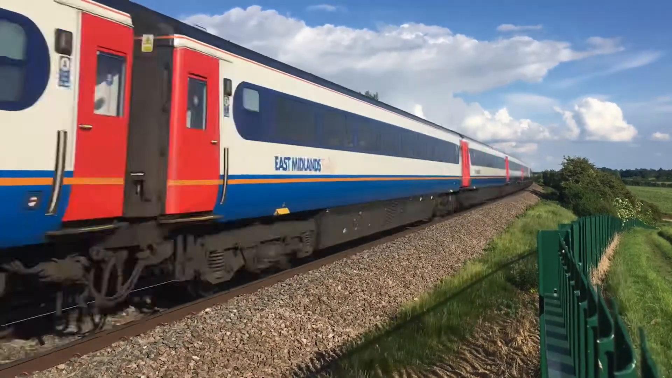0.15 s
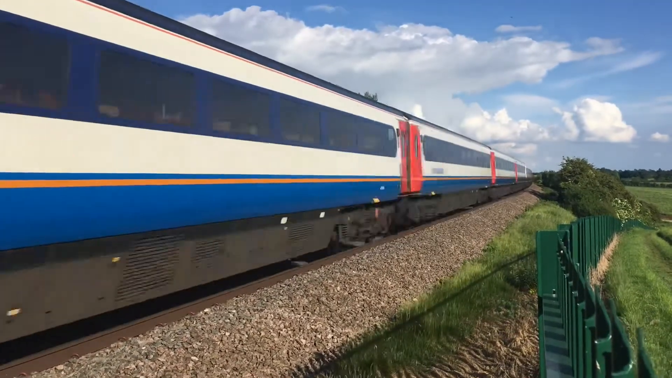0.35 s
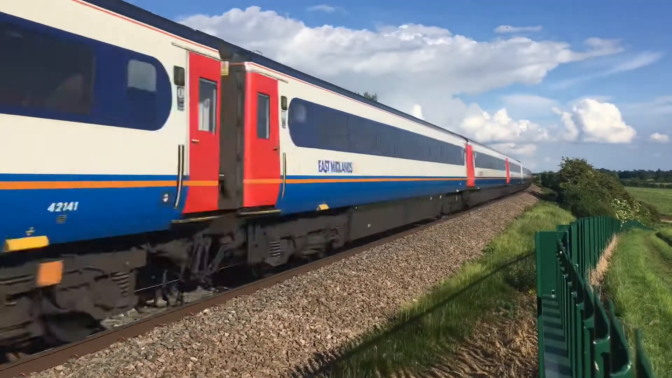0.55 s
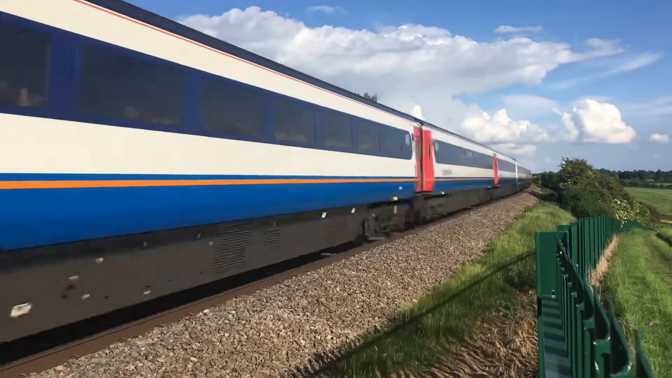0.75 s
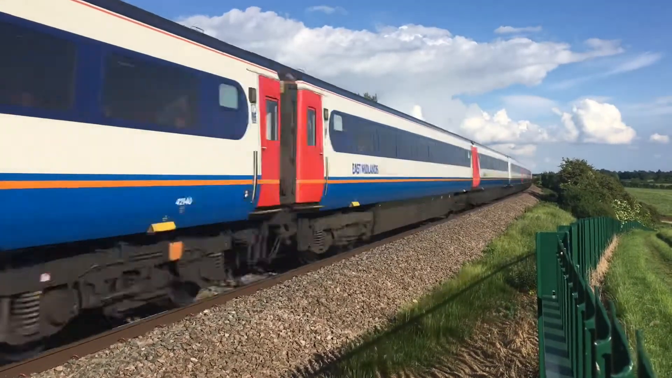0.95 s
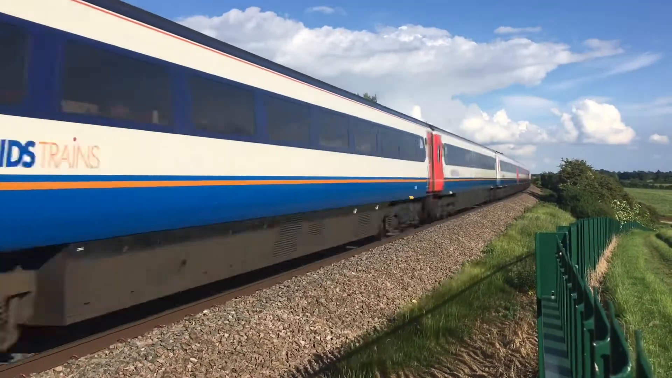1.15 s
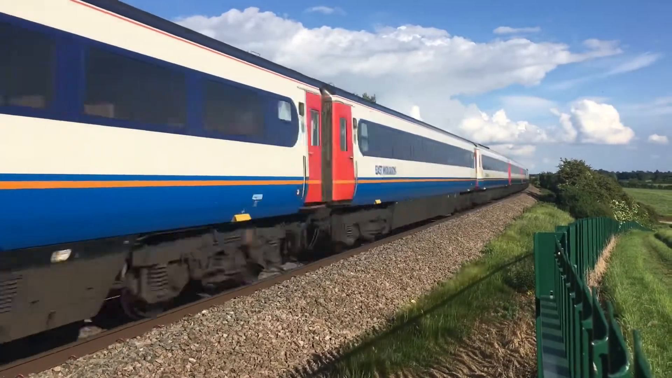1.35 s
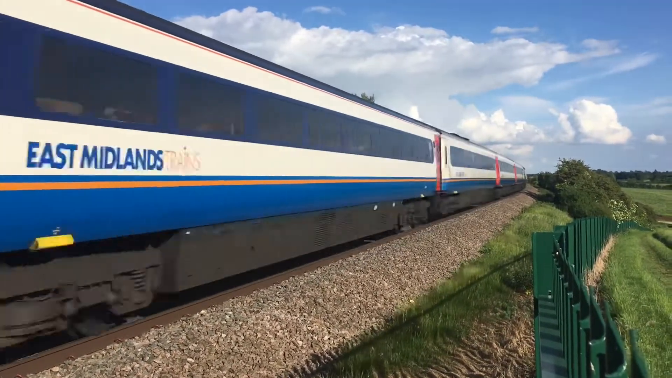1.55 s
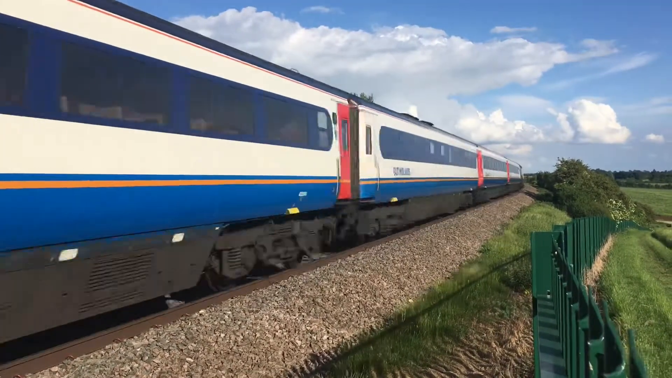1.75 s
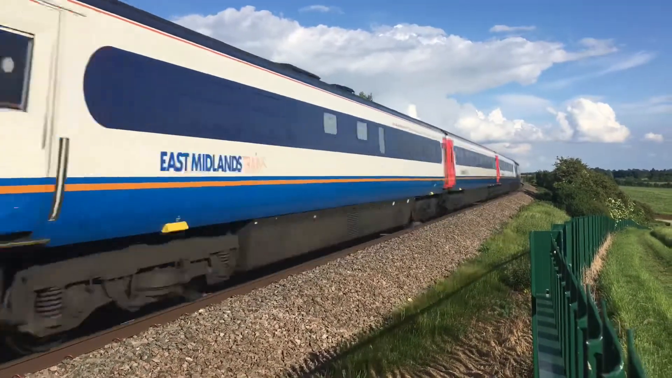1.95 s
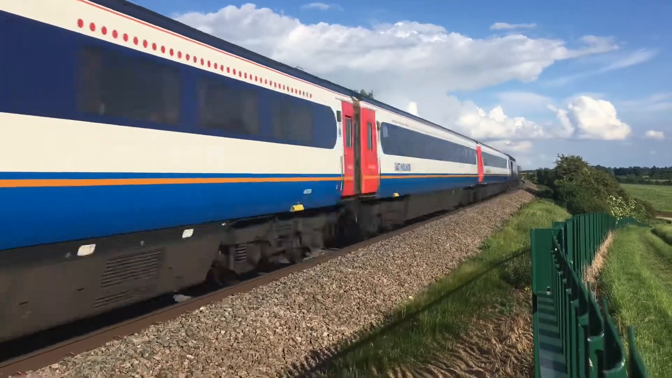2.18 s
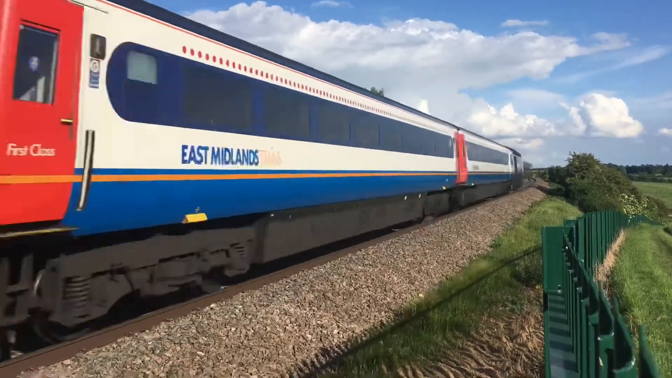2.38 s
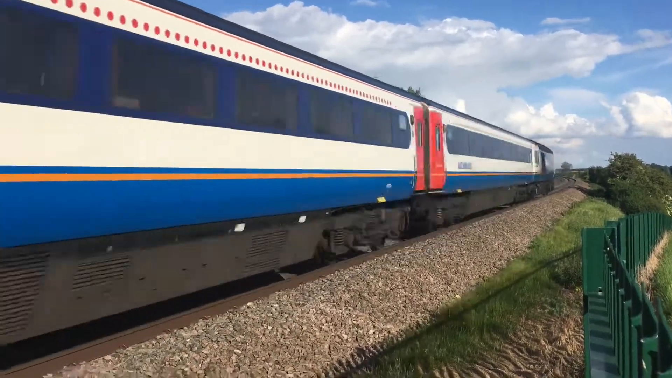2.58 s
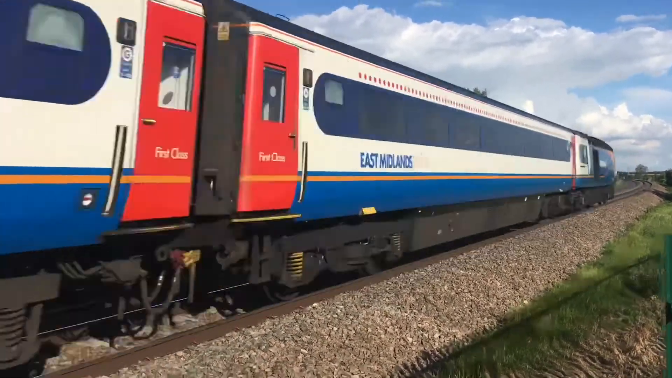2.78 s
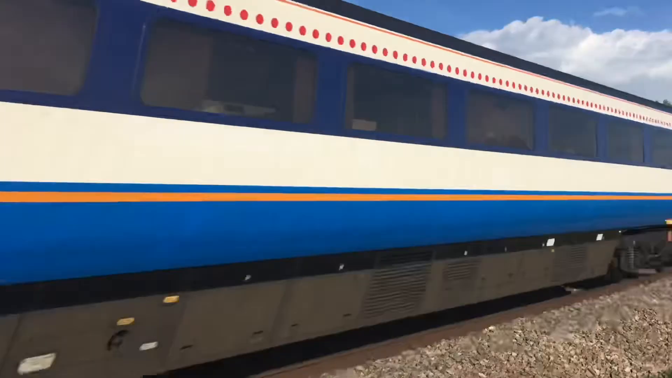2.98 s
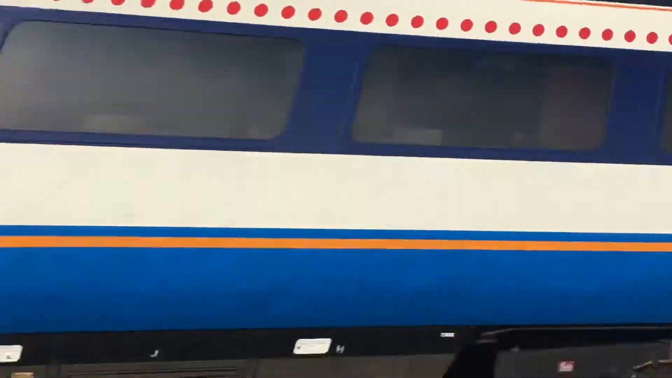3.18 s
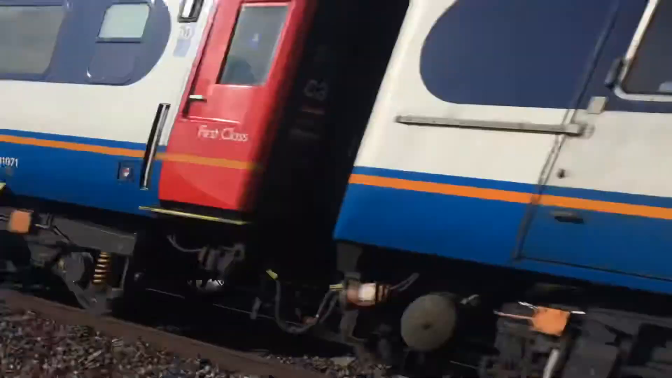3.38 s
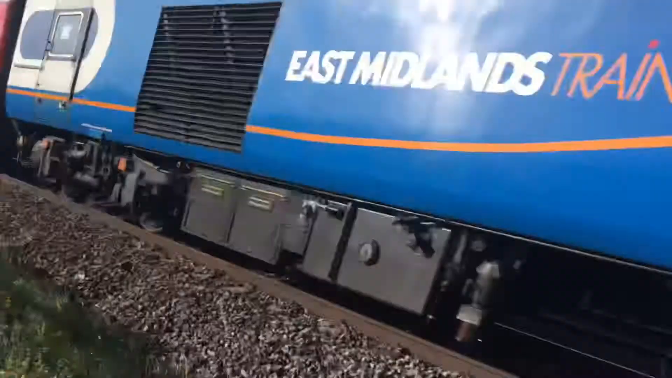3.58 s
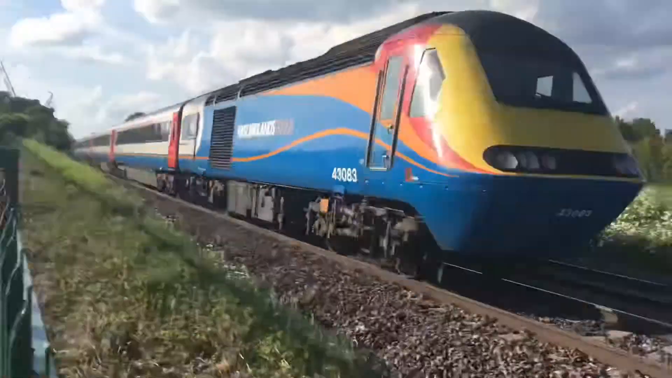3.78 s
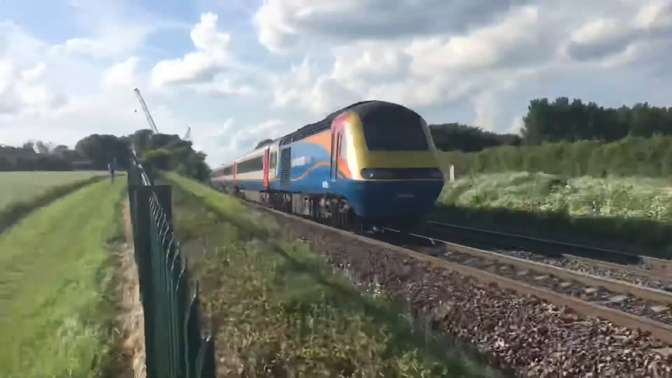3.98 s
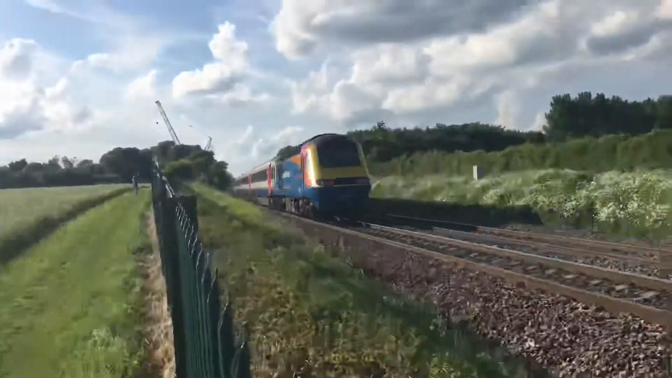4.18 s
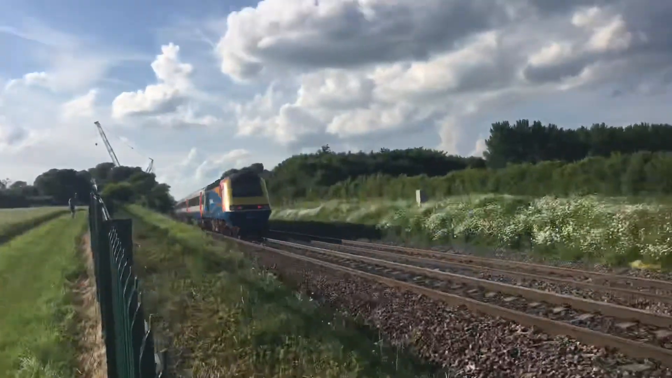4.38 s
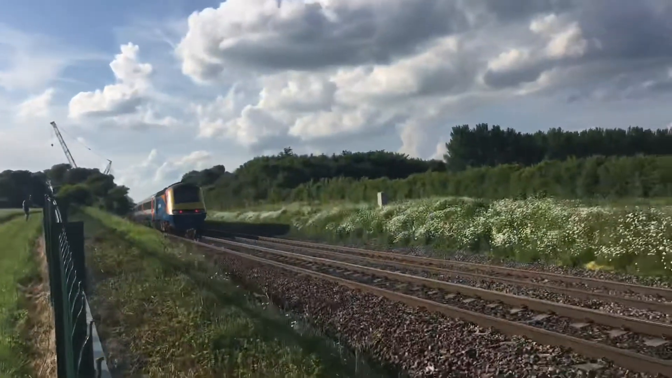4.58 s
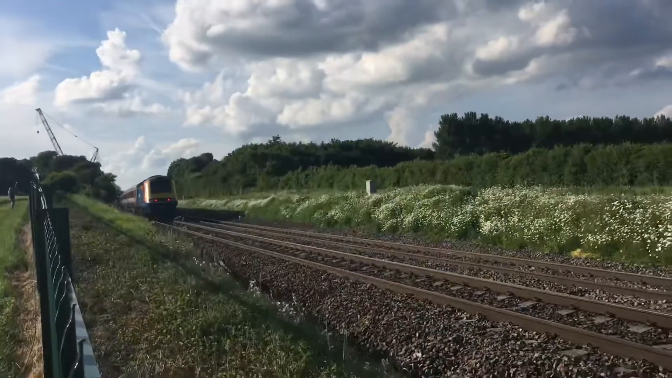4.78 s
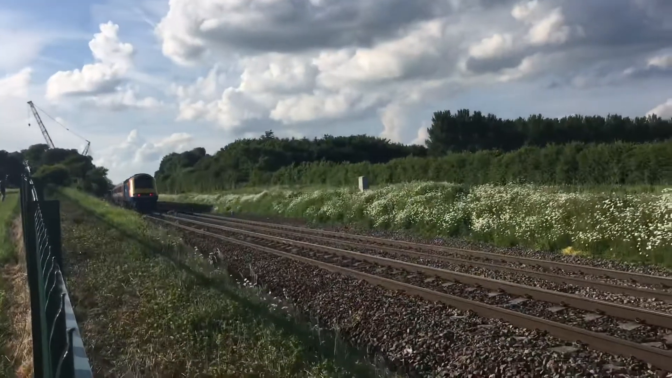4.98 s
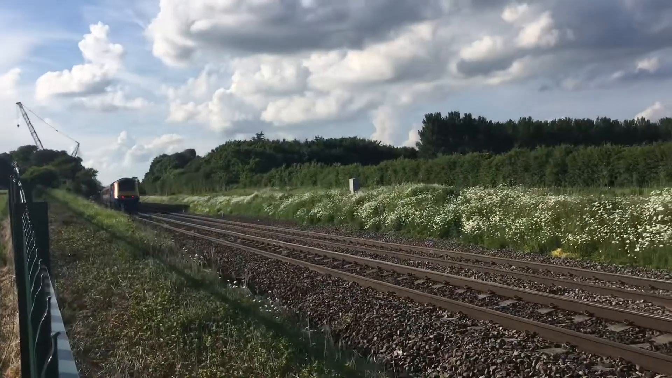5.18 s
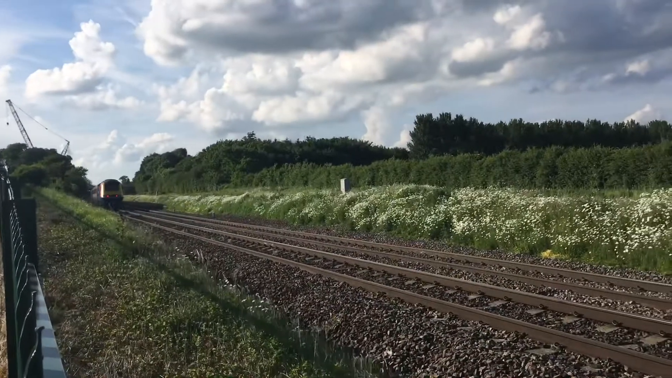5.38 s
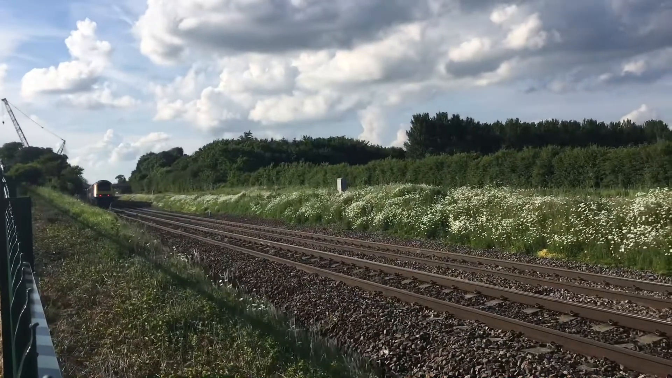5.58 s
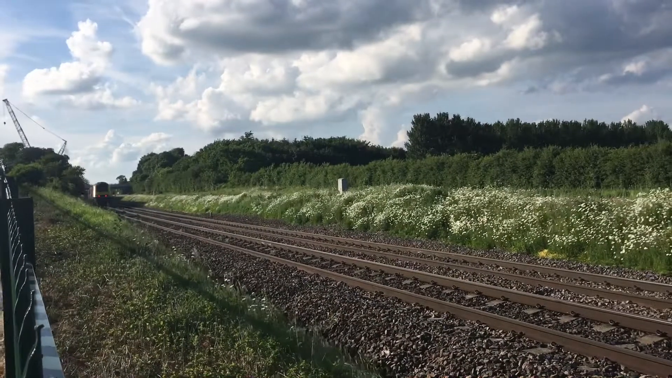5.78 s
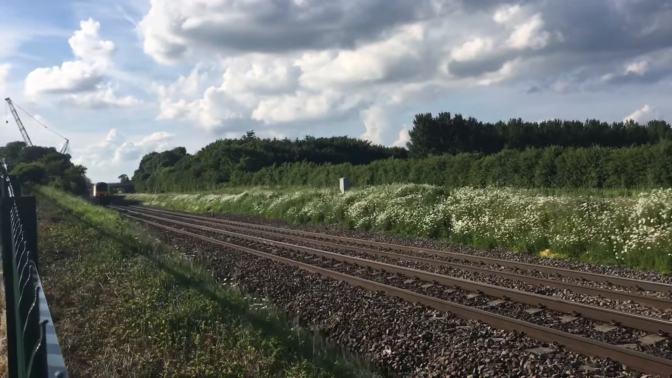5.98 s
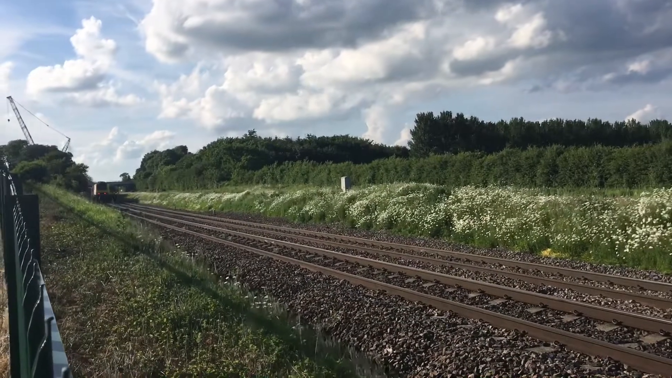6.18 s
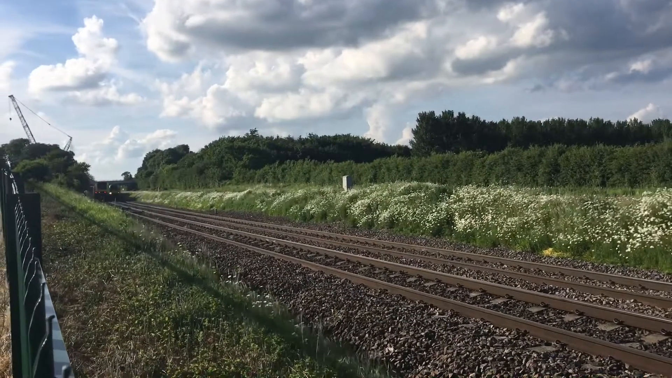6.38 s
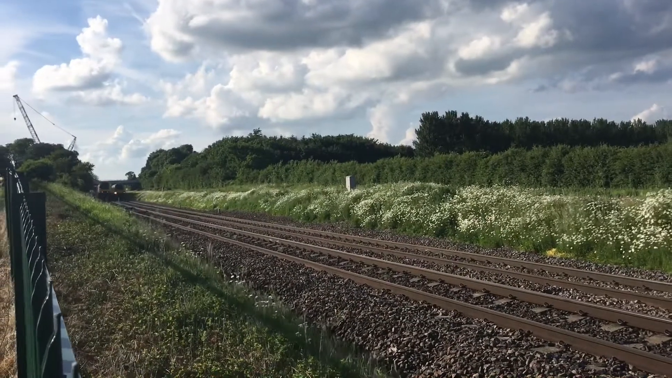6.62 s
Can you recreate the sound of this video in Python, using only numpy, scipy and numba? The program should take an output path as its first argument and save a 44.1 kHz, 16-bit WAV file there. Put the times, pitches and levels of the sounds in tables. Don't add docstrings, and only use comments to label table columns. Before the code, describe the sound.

Coaches rush by at close range, wheels roaring and a flat wheel hammering, before the last engine's hum drops and singing rails and windy grass remain.

```python
import sys
import numpy as np
from scipy import signal
from scipy.fft import rfft, irfft
from scipy.io import wavfile
from scipy.ndimage import uniform_filter1d
from numba import njit

SR = 44100
rng = np.random.default_rng(int(sys.argv[2]) if len(sys.argv) > 2 else 0)


def store_pcm(level_fs):
    pcm = np.round(np.clip(level_fs, -1, 1) * 32767).astype(np.int16)
    wavfile.write(sys.argv[1], SR, np.atleast_2d(pcm).T)


def gain_from_db(level_db):
    decades = np.asarray(level_db, float) / 20
    return 10 ** decades


N = 293220

# t/s, body level/dB, rail level/dB, wheel level/dB, air level/dB
BOGIES = [(-.02, -35, -21.5, -31.5, -53), (.25, -30.5, -24.5, -26, -46), (.36, -31, -22.5, -28.5, -52),
          (.63, -25.5, -23.5, -25.5, -42.5), (.76, -25.5, -28, -27.5, -35),
          (1.11, -21.5, -20.5, -18.5, -32.5), (1.24, -20.5, -20, -23, -36), (1.51, -25.5, -19.5, -24, -37),
          (1.63, -23, -15, -31, -37), (1.97, -19, -18, -20.5, -29.5), (2.099, -21, -15.5, -24, -36),
          (2.39, -22, -17.5, -22.5, -31.5), (2.52, -25, -21.5, -21.5, -31.5),
          (2.82, -21, -21.5, -25, -31.5), (2.94, -20.5, -22, -18, -32), (3.24, -21, -22, -16, -30.5),
          (3.38, -21.5, -15, -14, -28), (3.49, -20.5, -13, -16, -32), (3.66, -25.5, -16, -15.5, -31),
          (3.78, -34, -20, -23, -42)]


def slide(table):
    s, *columns = np.transpose(table)
    return [np.interp(np.arange(N) / SR, s, column) for column in columns]


def unit(x):
    return x / np.sqrt(np.mean(x ** 2))


def walk(rate):
    hold = int(SR / rate)
    held = rng.standard_normal(400)[np.arange(N) // hold % 400]
    return 1.248 * uniform_filter1d(uniform_filter1d(held, hold), hold)


def colour(table, lo_hz, hi_hz):
    hz, db = np.transpose(table)
    f = np.arange(1, 2 ** 18 + 2) * SR / 2 ** 19
    shape = gain_from_db(np.interp(np.log(f), np.log(hz), db, left=-90))
    bins = rfft(rng.standard_normal(2 ** 19)) * shape
    inside = np.sum(np.abs(bins[(f > lo_hz) & (f < hi_hz)]) ** 2)
    return irfft(bins)[:N] * 2 ** 18 * np.sqrt(2 / inside)


@njit
def svf(x, hz, width):
    y, band, low = np.empty(len(x)), 0., 0.
    for i in range(len(x)):
        g, k = np.tan(np.pi * hz[i] / SR), width / hz[i]
        v = (band + g * (x[i] - low)) / (1 + g * (g + k))
        band, low, y[i] = 2 * v - band, low + 2 * g * v, k * v
    return y


def ring(hz, width):
    return unit(svf(rng.standard_normal(N), hz + np.zeros(N), 1. * width))


def reeds(lo_hz, hi_hz, count):
    pitches = lo_hz + (hi_hz - lo_hz) * (np.arange(count) + rng.random(count)) / count
    return unit(sum(gain_from_db(4.5 * walk(11)) * ring(hz, 220) for hz in pitches))


def receding():
    gone_s, width_s = 3.77, 0.23
    return 1 / (1 + np.exp(-(np.arange(N) / SR - gone_s) / width_s))


def roar(colours, lo_hz, hi_hz):
    far = receding()
    near_noise = colour(colours[0], lo_hz, hi_hz)
    far_noise = colour(colours[1], lo_hz, hi_hz)
    return np.sqrt(1 - far) * near_noise + np.sqrt(far) * far_noise


def swells(times, lengths, levels_db, rest_db):
    t = np.arange(0, N, 64) / SR
    times, lengths, levels_db = (np.reshape(v, (-1, 1)) for v in (times, lengths, levels_db))
    bells = np.exp(-.5 * ((t - times) / lengths) ** 2)
    power = np.sum(gain_from_db(2 * levels_db) * bells, axis=0)
    return 10 * np.log10(np.interp(np.arange(N) / SR, t, power) + gain_from_db(2 * rest_db))


def heard(layer, bogie_db):
    # t/s, level/dB
    train = [(0, -31), (.5, -27), (.95, -23), (1.4, -22.5), (2.2, -26), (3.1, -20.5), (3.9, -20),
             (4.22, -23.5), (4.5, -21), (4.8, -23), (5.24, -25.5), (5.45, -28.5), (6.0, -29.5),
             (6.65, -32.5)]
    follow = {"body": (-3.5, -16, 2, 0.05), "rail": (-0.66, 0.44, 0.3, 0.064),
              "wheel": (0.2, 0.097, -1.1, 0.073), "air": (-12.5, -14, -2.5, 0.05),
              "grass": (-8, -18, 3.5, 0.09)}
    near_db, far_db, fade_db, length = follow[layer]
    clears_s, clear_width_s = 3.77, 0.16
    t = np.arange(N) / SR - clears_s
    far = .5 + .5 * np.tanh(t / clear_width_s)
    rest_db = slide(train)[0] + near_db + (far_db - near_db) * far + fade_db * np.maximum(t, 0)
    return swells(np.transpose(BOGIES)[0], length, bogie_db, rest_db)


def whine():
    # t/s, upper line level/dB, lower line level/dB
    whine_levels = [(0, -79, -82), (4.2, -60, -44), (4.55, -38, -48), (4.8, -41, -47), (5.1, -45, -62),
                    (5.5, -44, -66), (6, -42, -54), (6.3, -41, -41.5), (6.65, -46, -58)]
    whine_pitches = 566, 371
    out = 0
    for level_db, hz in zip(slide(whine_levels), whine_pitches):
        turns = np.cumsum(hz * (1 + 0.00404 * walk(6))) / SR
        out = out + gain_from_db(level_db + 3 + 1.2 * walk(9)) * np.sin(2 * np.pi * turns)
    return out


def rail_song():
    # f/Hz, width/Hz, level/dB, start t/s
    song = [
        (1240, 110, -36, 5),
        (1370, 73, -39, 5.1),
        (1613, 8.4, -33.5, 4.6),
        (1870, 50, -32, 5.67),
        (1965, 41, -38, 5.75),
        (2560, 21, -38.5, 4.2),
    ]
    song_fades = [0.5, 1, -4.5, -3.5, -16, -11]
    t, out = np.arange(N) / SR, 0
    for (hz, width, db, start), fade_db in zip(song, song_fades):
        rise = np.clip((t - start) / 0.61 + 1, 0, 1)
        level_db = db + fade_db * (t - start) + 1.5 * walk(6.8)
        out = out + rise * gain_from_db(level_db) * ring(hz, width)
    return out


def slipstream():
    # f/Hz, level/dB per Hz
    air_colours = [
        [(2880, -43), (4900, -4.5), (5860, 2.5), (7760, -4), (9450, -3), (10500, -9.5), (13600, -35), (22000, -120)],
        [(2880, -44), (4900, -10.5), (6090, -3.5), (6610, -3), (6940, -3), (7140, -6), (7420, -7), (9150, -5.5), (10500, -4), (13600, -36), (22000, -120)],
    ]
    # f/Hz, level/dB per Hz
    grass_colours = [
        [(6060, -20), (10300, -3), (11300, 0), (12800, -0.5), (14600, -3.5), (15600, -6)],
        [(6060, -48), (10300, -4), (11300, 3), (13100, 1), (14300, -1), (15600, -7)],
    ]
    # t/s, length/s, air level/dB, grass level/dB, fence whistle level/dB
    gusts = [(4.004, 0.058, -38, -34, -62), (4.302, 0.021, -38, -36, -44), (4.385, .025, -35, -31, -50),
             (4.497, 0.032, -41, -38, -50), (4.578, 0.019, -38, -30, -44), (4.632, 0.0088, -34, -42, -37),
             (4.7, 0.017, -37, -29, -39), (4.815, 0.048, -33, -31, -41), (4.952, 0.015, -35.5, -35, -49),
             (5.08, 0.021, -44.5, -37, -51), (5.17, .03, -52, -42, -43), (5.264, .04, -40, -37, -41),
             (5.584, 0.054, -41, -34.5, -42), (5.757, 0.046, -45, -34.5, -38.5), (5.9, .04, -46, -43, -44),
             (6.007, 0.035, -52, -37, -41.5), (6.085, 0.023, -44, -39, -41), (6.22, .03, -50, -43, -54.5),
             (6.38, .045, -48, -35, -44), (6.56, .04, -53, -46.5, -51)]
    # t/s, level/dB
    fan = [(0, -62), (3, -55), (3.3, -30), (3.43, -28), (3.55, -32), (3.65, -28), (3.85, -36.5), (4.4, -46),
           (6.65, -72)]
    whistle_hz, whistle_linger = 6730, 1.8
    s, length, air_db, grass_db, whistle_db = np.transpose(gusts)
    tear_db = np.transpose(BOGIES)[-1]
    far = receding()
    air_db = swells(s, length, air_db, heard("air", tear_db))
    grass_db = swells(s, length, grass_db, heard("grass", tear_db - 0.5))
    whistle_db = swells(s, whistle_linger * length, whistle_db, -56 - 30 * (1 - far))
    gust = walk(27.77)
    air_db = air_db - 1.5 + (0.54 + 0.9 * far) * gust + 0.5 * walk(12)
    grass_db = grass_db - 1.5 + (0.2 + 0.9 * far) * gust + 1.0 * walk(25.3)
    air = roar(air_colours, 6580, 11500) + far * reeds(5500, 10100, count=10) * gain_from_db(-6)
    grass = roar(grass_colours, 10200, 15500) + far * reeds(10860, 14600, count=12) * gain_from_db(-3)
    slats = unit(ring(whistle_hz, 56) + 0.69 * ring(whistle_hz - 40, 270))
    whistle = gain_from_db(whistle_db - 1.5 + 2.7 * walk(32)) * slats
    rush = gain_from_db(slide(fan)[0] + 2.9 * walk(14)) * (ring(5900, 1100) + gain_from_db(1) * ring(221, 75))
    return gain_from_db(air_db) * air + gain_from_db(grass_db) * grass + whistle + rush


def wheel_flat():
    # t/s, peak level/dB, rail ring f/Hz, rattle length/s
    knocks = [(1.222, -4, 900, .01), (1.277, -.5, 745, .012), (1.3303, 0, 860, .008),
              (1.387, -5, 950, .012), (1.442, -4, 1000, .014), (1.499, -6, 900, .01),
              (1.548, -5, 1000, .008), (1.564, -4, 1050, .01), (1.614, -3, 1050, .012),
              (1.665, -3, 950, .01), (1.995, -7, 1000, .01), (2.895, -8, 1000, .01)]
    # f/Hz, width/Hz, level/dB
    knock_modes = [
        (1390, 220, -9),
        (2210, 240, -2),
        (3500, 730, -41),
        (6400, 880, -19.5),
    ]
    out, tail = np.zeros(N), np.arange(3000) / SR
    rattles = rng.standard_normal((len(knocks), len(tail)))
    for (s, db, rail_hz, length), rattle in zip(knocks, rattles):
        crack = tail < 1 / 3000
        blow = 0.8 * rattle * np.exp(-tail / (1.3 * length)) + 1.2 * crack
        rings = np.zeros(len(tail))
        for hz, width, mode_db in [(rail_hz, 260, 0)] + knock_modes:
            centre = np.full(len(tail), 1. * hz)
            rings += gain_from_db(mode_db) * svf(svf(blow, centre, 3.3 * width), centre, 1. * width)
        start = int(s * SR)
        out[start:start + len(tail)] += gain_from_db(db - 2.0) * rings / np.abs(rings).max()
    return out


def engines():
    # t/s, level/dB
    hum_levels = [(0, -43), (.6, -27.5), (1.3, -27), (2.2, -27), (3.0, -23.5), (3.7, -20), (4.05, -33),
                  (5.0, -33), (6.0, -31), (6.65, -40)]
    # f/Hz, level coming/dB, level going/dB
    partials = [
        (50.2, -12, -6),
        (71.3, 1, 0),
        (94.5, -26, -14),
        (117.5, -26, -17),
        (142.6, -11, -26),
    ]
    # t/s, length/s, level/dB
    throbs = [(0.174, 0.047, -26.5), (0.667, 0.056, -20), (1.05, .12, -21), (1.487, 0.038, -18.5),
              (1.967, 0.07, -15.5), (2.46, 0.055, -18), (2.785, 0.076, -16.5), (3.3, .15, -18.5),
              (3.78, 0.12, -20), (4.305, 0.068, -25), (4.617, 0.17, -23), (5.35, 0.13, -27.5),
              (5.75, .1, -34), (6.354, 0.11, -31.5)]
    passing_s, distance_m, speed_ms = 3.62, 3.6, 52.
    t, far = np.arange(N) / SR, receding()
    along = speed_ms * (t - passing_s)
    direction = along / np.hypot(along, distance_m)
    shift = 1 / (1 + speed_ms / 343 * direction)
    going = .5 + .5 * direction
    lead_turns = np.cumsum(66.3 + 2.0 * walk(4.95)) / SR
    lead_db = 1 - 1.5 * np.abs(t - 1.3) + 2.0 * walk(7.9)
    hum = gain_from_db(lead_db) * (1 - far) * np.sin(2 * np.pi * lead_turns)
    for hz, come_db, go_db in partials:
        turns = np.cumsum(hz * shift * (1 + 0.0151 * walk(6))) / SR
        level_db = come_db + (go_db - come_db) * going + 2.2 * walk(11)
        hum = hum + gain_from_db(level_db) * np.sin(2 * np.pi * turns)
    return gain_from_db(swells(*np.transpose(throbs), slide(hum_levels)[0]) - 0.5) * hum


def rolling():
    # f/Hz, level/dB per Hz
    rumble_colours = [
        [(15, -45), (25, -20), (40, 1.5), (60, -6), (95, -4), (170, -7.5), (286, -15.5), (480, -18.5), (620, -33), (1060, -120)],
        [(15, -34), (25, -17), (65, 4.5), (84, -4), (113, -9.5), (205, -19.5), (296, -19.5), (361, -13), (480, -24), (620, -62), (1060, -120)],
    ]
    # f/Hz, level/dB per Hz
    rail_colours = [
        [(250, -38), (430, -7.5), (496, -9), (539, -3.5), (774, -1), (1040, 1), (1290, -4.5), (1600, -21), (2080, -12.5), (3520, -120)],
        [(250, -47), (430, -18), (530, -12), (600, -7.5), (690, -1.5), (1000, -2.5), (1250, -3), (1400, -8), (1600, -10), (2080, -20), (3520, -120)],
    ]
    # f/Hz, level/dB per Hz
    wheel_colours = [
        [(880, -13), (1500, -4.5), (1750, -4.5), (1950, -6.5), (2230, -2.5), (2550, -5), (2900, -10), (3700, -13.5), (5100, -22), (6630, -57), (11200, -120)],
        [(880, -23), (1500, -2), (1910, 2), (2220, -6), (2350, -7), (2610, -11.5), (3120, -19.5), (3870, -20), (5100, -27), (6630, -45), (11200, -120)],
    ]
    # t/s, rail ring f/Hz, wheel ring f/Hz
    ring_pitches = [(0, 860, 2180), (.7, 926, 2220), (1.2, 1000, 2210), (1.6, 1000, 2294),
                    (2.7, 1020, 2212), (3.2, 1060, 2125), (3.8, 977, 2054), (4.45, 794, 2170),
                    (4.8, 786, 2180), (5.3, 1060, 1990), (6.65, 1070, 2010)]
    # t/s, length/s, level over the wheel noise/dB
    discs = [(0, 0.13, -1), (0.547, 0.035, 2), (.8, 0.18, -5), (1.2, .12, -6), (1.65, 0.18, -2.5),
             (2.1, .15, -9), (2.7, 0.071, 0), (3.113, 0.064, -1), (3.496, 0.17, -7), (4.495, 0.43, -5),
             (4.85, 0.058, -13)]
    _, body_db, rail_db, wheel_db, _ = np.transpose(BOGIES)
    body_db, rail_db, wheel_db = heard("body", body_db), heard("rail", rail_db), heard("wheel", wheel_db)
    rail_hz, wheel_hz = slide(ring_pitches)
    body = gain_from_db(body_db + 1.0 * walk(14)) * roar(rumble_colours, 83.5, 510)
    rail_ring_db = -4.5 + 0.54 * np.maximum(rail_db + 18, -6)
    rail = roar(rail_colours, 480, 1640) + gain_from_db(rail_ring_db) * ring(rail_hz, 106)
    disc_db = swells(*np.transpose(discs), -24) + 2.0 * walk(13)
    disc_song = unit(svf(ring(wheel_hz, 103), wheel_hz, 150.0))
    wheel = roar(wheel_colours, 1745, 4500) + gain_from_db(disc_db) * disc_song
    edge_db = 0.45 * (rail_db - wheel_db) - 12.5
    wheel = wheel + (1 - receding()) * gain_from_db(edge_db) * ring(2750, 1700)
    rail = gain_from_db(rail_db - 1.35 + 0.5 * walk(12)) * rail
    wheel = gain_from_db(wheel_db - 3.0 + 1.03 * walk(14)) * wheel
    return body + rail + wheel


def scene():
    mono = whine() + rail_song() + slipstream() + wheel_flat() + engines() + rolling()
    return np.array([mono, mono])


def top_cut(x):
    return signal.sosfilt(signal.butter(12, 15710, fs=SR, output="sos"), x)


def record(dry):
    # f/Hz, width/Hz, depth/0-1
    notches = [
        (5000, 230, 0.54),
        (10400, 620, 0.67),
    ]
    x = signal.sosfilt(signal.butter(N=5, Wn=37., btype="high", fs=SR, output="sos"), dry[0])
    for hz, width, depth in notches:
        x = x - depth * svf(x, np.full(N, 1. * hz), 1. * width)
    x = x / (1 + np.abs(x / 1.05) ** 6) ** (1 / 6)
    return top_cut(np.array([x, x]))


dry = scene()
out = record(dry)
store_pcm(out)
```